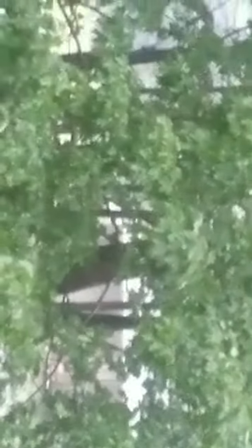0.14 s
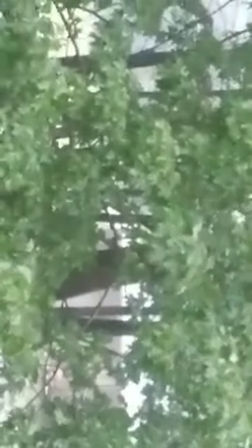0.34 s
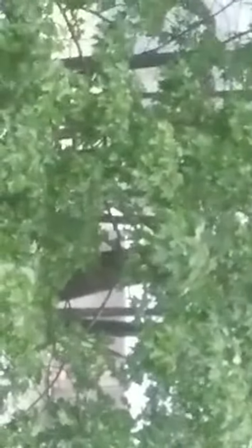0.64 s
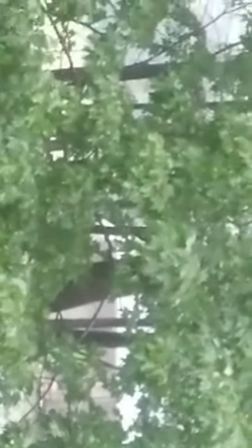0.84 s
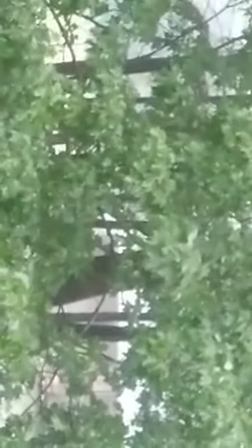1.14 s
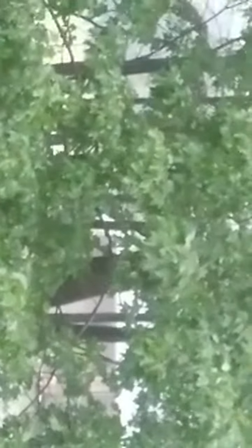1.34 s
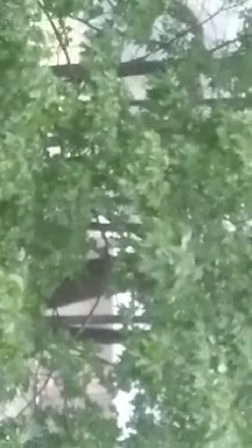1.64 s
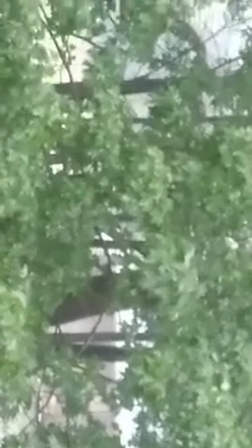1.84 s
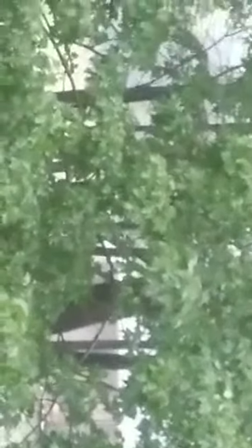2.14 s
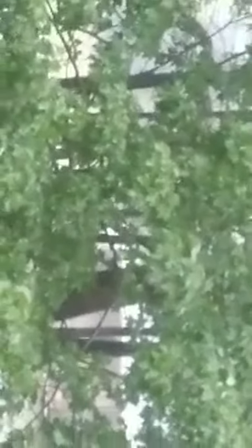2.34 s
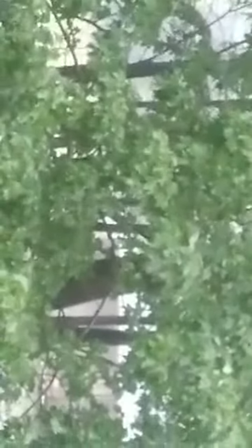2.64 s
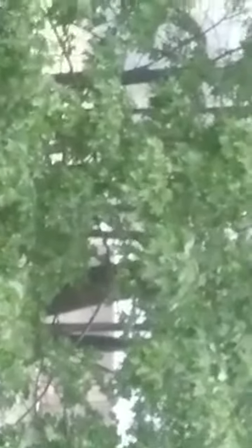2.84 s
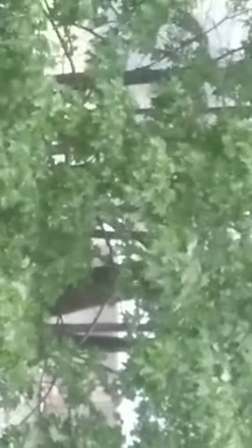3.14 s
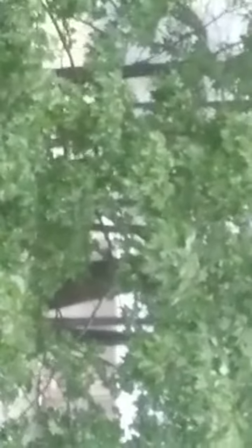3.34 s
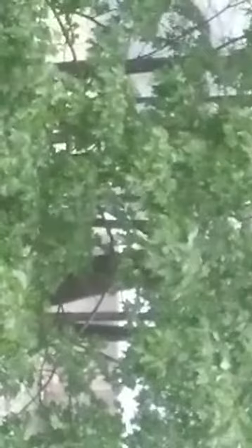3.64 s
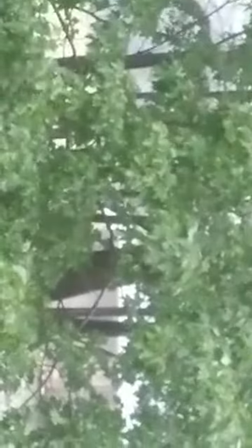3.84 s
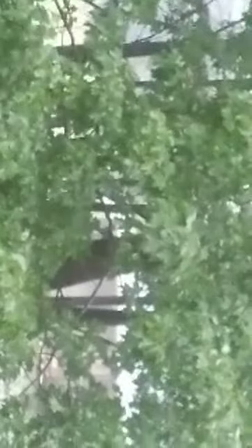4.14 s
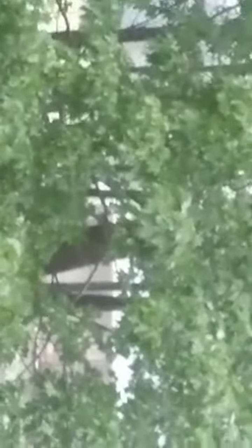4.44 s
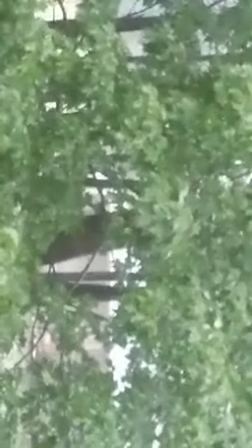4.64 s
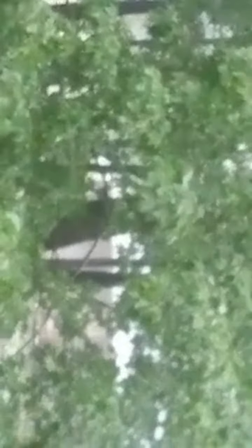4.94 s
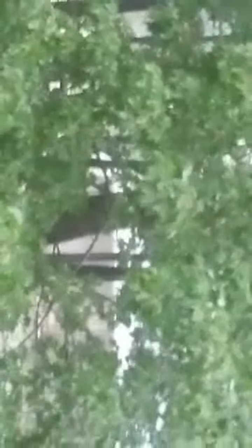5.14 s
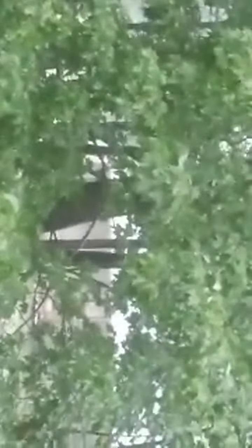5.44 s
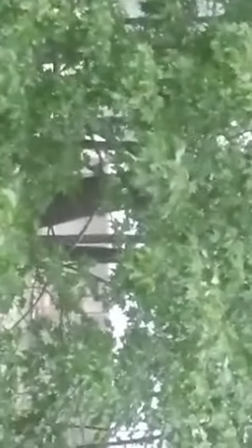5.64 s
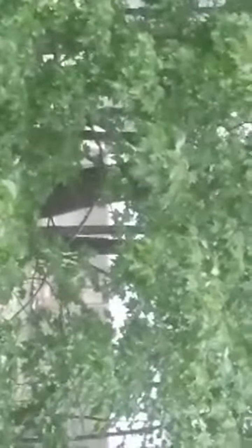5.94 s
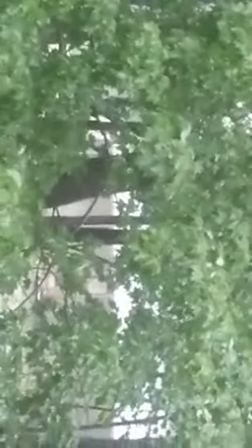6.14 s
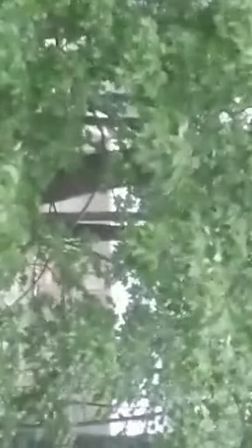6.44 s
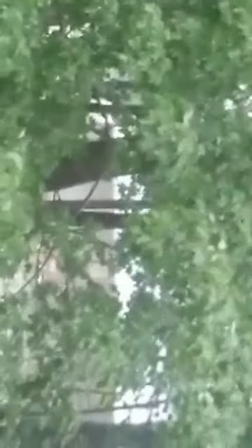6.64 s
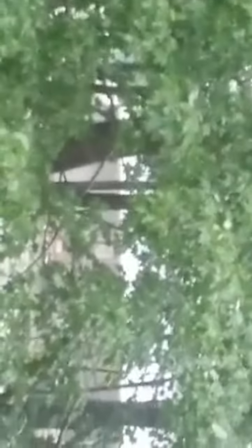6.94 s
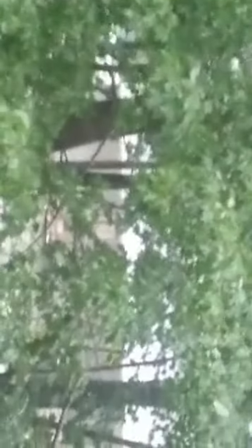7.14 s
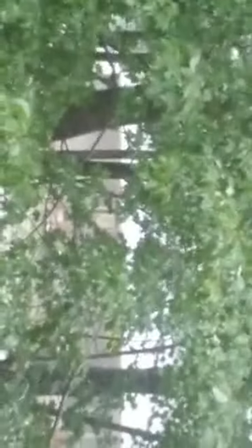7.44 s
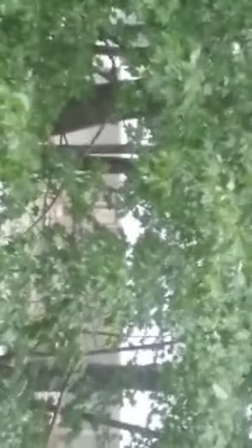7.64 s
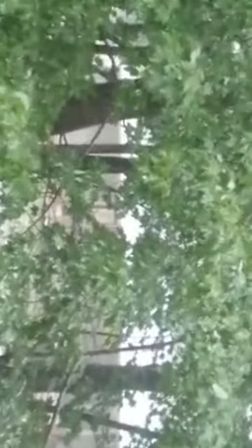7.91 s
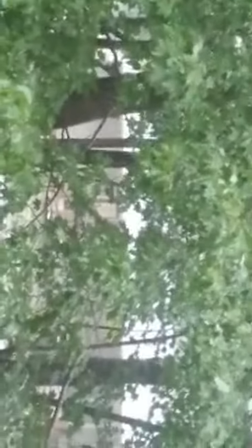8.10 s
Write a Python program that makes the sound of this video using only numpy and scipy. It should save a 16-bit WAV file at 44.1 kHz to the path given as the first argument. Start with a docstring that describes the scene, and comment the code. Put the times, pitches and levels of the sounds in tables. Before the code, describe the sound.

Light rain among leafy trees, captured close in mono by a phone. A faint hiss of distant drops is held down and surges briefly with louder drips. Leaf ticks and dull low pats come first, then higher plinks; a bright ringing clink sounds just before four seconds, two finer ones soon after, and a thin one later.

```python
"""Light rain on garden trees, in mono through a phone microphone with a noise gate.
All along, countless far drops merge into a soft hiss: shaped noise, fine patter and resonances.
From 0.4 s near drops burst on leaves as short noise and pat on slack surfaces as low damped tones.
Higher plinks join from 1.9 s; hard things clink at 3.8, twice near 4.15 and at 6.5 s, as beating modes.
The gate holds the hiss down and lets it surge up briefly with the louder drips."""
import sys
import numpy as np
from scipy import signal
from scipy.fft import rfft, irfft, next_fast_len
from scipy.io import wavfile
from scipy.ndimage import uniform_filter1d

SR = 44100
rng = np.random.default_rng(int(sys.argv[2]) if len(sys.argv) > 2 else 0)


def int16_out(signal):
    """Quantize to a 16-bit WAV file."""
    q = np.round(np.clip(np.atleast_2d(signal).T, -1, 1) * 32767)
    wavfile.write(sys.argv[1], SR, q.astype(np.int16))


N = 364707


def undb(db):
    """Decibels to gain."""
    return 10 ** (np.asarray(db) / 20)


def unit(x):
    """Scale to rms 1."""
    return x / np.sqrt(np.mean(x ** 2))


def colour(x, points):
    """Shape the spectrum by (Hz, dB) points joined on a log frequency axis; rms 1."""
    point_hz, point_db = np.transpose(points)
    size = next_fast_len(N, True)
    bin_hz = np.maximum(np.arange(size // 2 + 1) * SR / size, 1)
    gain = undb(np.interp(np.log(bin_hz), np.log(point_hz), point_db))
    return unit(irfft(rfft(x, size) * gain, size)[:N])


def resonate(x, hz, width_hz):
    """One resonance, passed twice for steep flanks; rms 1."""
    b, a = signal.iirpeak(hz, hz / width_hz, fs=SR)
    once = signal.lfilter(b, a, x + 1e-18)
    return unit(signal.lfilter(b, a, once))


def walk(rate):
    """Smooth random drift with a spread near 1, taking `rate` new values per second."""
    hold = int(SR / rate)
    steps = np.repeat(rng.standard_normal(N // hold + 1), hold)
    return unit(uniform_filter1d(steps, hold))[:N]


def swell(rise, t60):
    """Time axis and envelope of a push that builds up and dies away; peak 1."""
    t = np.arange(int((t60 + 2 * rise) * SR)) / SR
    build_up = 1 - np.exp(-(t / rise) ** 2)
    envelope = build_up * np.exp(-np.log(1000) * t / t60)
    return t, envelope / envelope.max()


def add(out, start_s, sound):
    """Mix a sound in at its start time, cut at the end of the scene."""
    i = int(start_s * SR)
    out[i:i + len(sound)] += sound[:N - i]


def patter(rate, spread_db):
    """Random impacts of either sign, `rate` per second, many small and a few large."""
    when, rank, side = rng.random((int(rate * N / SR), 3)).T
    size = undb(-spread_db * np.log(rank + .01))
    return np.bincount((when * N).astype(int), size * np.sign(side - .5), N)


# The wash of rain on far trees. Each row: frequency in Hz, relative density in dB per Hz.
WASH_SPECTRUM = [(20, -45), (48, -21), (105, -3), (175, -2.5), (240, -0.5), (420, -6), (850, -10),
                 (1500, -9), (2600, -10.5), (4600, -11.5), (6700, -7), (8600, -7.5), (10200, -13),
                 (15500, -21.5)]
# Surfaces far drops keep ringing. Each row: pitch in Hz, width of each filter pass in Hz,
# level in dB against the wash, drops per second.
RINGING_SURFACES = [(250, 204, -18, 90), (1834, 180, -15, 300), (6860, 990, -15, 150),
                    (8250, 460, -15.5, 150)]


def far_rain():
    """A wash of merged drops with flurries of fine patter on top; drops keep a few surfaces ringing."""
    wash = colour(rng.standard_normal(N), WASH_SPECTRUM) * undb(0.56 * walk(12))
    flurries = undb(1.9 * walk(16))
    fine = colour(patter(rate=600, spread_db=2.5), SPLASH_SPECTRUM) * flurries
    ringing = sum(undb(db) * resonate(patter(rate, spread_db=2.0), hz, width_hz)
                  for hz, width_hz, db, rate in RINGING_SURFACES)
    wash_db, fine_db = -46.5, -9.5  # the fine patter is set against the wash
    return undb(wash_db) * (wash + undb(fine_db) * fine + ringing)


# A drop bursting on a leaf. Each row: frequency in Hz, relative density in dB per Hz.
SPLASH_SPECTRUM = [(100, -17.5), (350, -2.5), (1000, -11), (3000, -8.5), (5000, -5.5), (7200, 1.5),
                   (9000, -7), (11000, -15), (15500, -13)]


def splashes(table, rise, t60, spray_db, spray_t60):
    """A short noise burst as the drop breaks, with a fainter, longer spray of droplets."""
    force = np.zeros(N)
    for start_s, db, *_ in table:
        add(force, start_s, undb(db) * swell(rise, t60)[1])
        add(force, start_s, undb(db + spray_db) * swell(rise, spray_t60)[1])
    return force * colour(rng.standard_normal(N), SPLASH_SPECTRUM)


def drips(table, rise, glide, wobble):
    """Each drip pushes one damped mode, whose pitch slides and trembles as the water spreads."""
    out = np.zeros(N)
    tremble = np.tile(walk(500), 2)
    for start_s, db, hz, t60 in table:
        t, envelope = swell(rise, t60)
        trembling = wobble * tremble[int(start_s * SR):][:len(t)]
        pitch = hz * (1 + glide * t + trembling)  # glide: fraction of the pitch per second, upward
        add(out, start_s, undb(db) * envelope * np.sin(2 * np.pi * np.cumsum(pitch) / SR))
    return out


def faint_drips(low_hz, high_hz, top_db, spread_db, mean_t60, count):
    """Drips further off, scattered in time and pitch, as rows (s, dB, Hz, t60 s)."""
    when, pitch, size, ring = rng.random((count, 4)).T
    hz = low_hz * (high_hz / low_hz) ** pitch
    return np.transpose([when * N / SR, top_db - spread_db * size, hz, mean_t60 * (.5 + ring)])


# Drops bursting on leaves near the microphone.
# Each row: start in seconds, level in dB before the trim shared by all leaves.
LEAF_SPLASHES = [(.4035, -42), (.503, -42.5), (.598, -44.5), (.7425, -40.5), (1.0445, -40), (1.0785, -44),
                 (1.246, -46), (1.358, -43), (1.952, -41), (2.0805, -44.5), (2.922, -44.5), (3.397, -44.5),
                 (3.411, -43.5), (4.323, -42.5), (4.499, -44), (6.4955, -42), (6.505, -45), (6.612, -44),
                 (6.905, -42), (7.2975, -42.5), (8.154, -41.5)]


def leaves(small_db, count=16):
    """Drops burst on the near leaves, with smaller ones at random in between."""
    small = [(start_s, small_db) for start_s in rng.random(count) * N / SR]
    bursts = splashes([*LEAF_SPLASHES, *small], rise=0.0027, t60=0.018, spray_db=-18, spray_t60=0.18)
    return undb(0.8) * bursts  # shared trim


# Heavy drips close by on slack, hollow surfaces.
# Each row: start in seconds, peak in dB before the trim shared by all pats, starting pitch in Hz.
HEAVY_PATS = [(0.4, -44, 358), (0.669, -34, 260), (0.788, -38, 275), (0.797, -37.5, 290), (0.998, -31, 433),
              (1.018, -39, 432), (1.921, -32, 243), (2.798, -35.5, 210), (3.368, -30, 243),
              (3.402, -38, 269), (3.511, -45.5, 563), (4.278, -43.5, 517), (6.658, -33, 386),
              (6.672, -41.5, 414), (8.238, -33, 389)]


def pats():
    """Heavy drips thud on slack surfaces, most of them near and a few further off."""
    decay_cycles = 12.4  # t60 in cycles of the starting pitch, so deep pats last longer
    near = [(start_s, db, hz, decay_cycles / hz) for start_s, db, hz in HEAVY_PATS]
    further = faint_drips(low_hz=201, high_hz=519, top_db=-44.0, spread_db=3, mean_t60=0.04, count=12)
    return undb(0.14) * drips([*near, *further], rise=0.0049, glide=0.22, wobble=0.026)


# Close drips that ring small stiff things and puddles.
# Each row: start in seconds, peak of the ring in dB, starting pitch in Hz, t60 in seconds.
NEAR_PLINKS = [(1.920, -48, 1274, .04), (3.120, -36, 2340, 0.023), (3.506, -34, 1886, 0.073),
               (4.681, -33, 5800, .05), (4.698, -40, 8820, .04), (4.742, -43.5, 1701, .04),
               (4.827, -35.5, 8000, .04), (4.829, -35.5, 1806, 0.047), (5.342, -36, 4680, 0.057),
               (5.501, -36, 8115, 0.047), (5.505, -40.5, 9399, .03), (5.515, -45.5, 7800, .017),
               (5.549, -36, 2340, 0.025), (5.589, -42.5, 3467, .035), (5.677, -35.5, 3660, 0.043),
               (5.698, -42.5, 4130, .03), (7.030, -36.5, 6310, 0.058), (7.069, -43, 2210, .037),
               (7.127, -47, 1773, .04), (7.296, -41, 3480, 0.028), (7.956, -42.5, 1780, 0.058),
               (8.238, -43, 1263, 0.016)]


def plinks():
    """Near drips splash and ring at once; further off only the ring carries, and tiny drops tick on leaves."""
    ring = drips(NEAR_PLINKS, rise=0.0045, glide=.04, wobble=0.014)
    splash = splashes(NEAR_PLINKS, rise=0.0059, t60=.022, spray_db=-24.5, spray_t60=0.092)
    distant = faint_drips(low_hz=1210, high_hz=9360, top_db=-48, spread_db=5.5, mean_t60=0.023, count=100)
    ticks = faint_drips(low_hz=5780, high_hz=9180, top_db=-47.0, spread_db=6, mean_t60=0.039, count=130)
    faint = drips([*distant, *ticks], rise=0.0032, glide=.2, wobble=.015)
    splash_db = -8  # against the ring
    return ring + undb(splash_db) * splash + faint


# Four hard things under the trees, each row a cluster of close modes.
# Each row: centre in Hz, spread to either side in Hz, level in dB, t60 in seconds.
LOUD_MODES = [(4634, 14, -35.5, 0.25), (4790, 220, -39, 0.38), (4320, 150, -39.5, 0.3),
              (4950, 770, -30.5, 0.023), (5080, 400, -42, .2), (6320, 250, -36, 0.084),
              (2345, 130, -50.5, 0.078)]
SIZZLING_MODES = [(6140, 120, -46, .14), (8330, 70, -44, 0.14), (6060, 2500, -43.5, 0.2),
                  (10600, 1700, -43, .19)]
CHIMING_MODES = [(7520, 150, -36, 0.23), (6500, 170, -44, 0.24)]
THIN_MODES = [(8560, 140, -38, 0.077), (9920, 150, -44, 0.098), (7150, 73, -46, .05), (6720, 125, -45, .22)]
# The bright clinks. Each row: start in seconds, rise in seconds, modes of the thing struck.
CLINK_HITS = [(3.795, .006, LOUD_MODES), (4.134, 0.015, SIZZLING_MODES), (4.165, 0.0055, CHIMING_MODES),
              (6.537, 0.0082, THIN_MODES)]


def clinks(count=70):
    """The drop splashes, and close modes of the hard object beat against each other as they fade."""
    splash_db = -42
    drops = [(start_s, splash_db) for start_s, *_ in CLINK_HITS]
    out = splashes(drops, rise=0.0028, t60=0.028, spray_db=-11, spray_t60=0.12)
    for start_s, rise, clusters in CLINK_HITS:
        for hz, spread_hz, db, t60 in clusters:
            t, envelope = swell(rise, t60)
            place, phase = rng.random((2, count, 1))
            rank = 2 * (np.arange(count)[:, None] + place) / count - 1
            # crowded near the centre
            modes = hz + spread_hz * np.sign(rank) * (1 - np.sqrt(1 - np.abs(rank)))
            ring = envelope * np.sin(2 * np.pi * (modes * t + phase)).sum(axis=0)
            # the beating ring gets the energy of its envelope
            same_energy = np.sqrt(np.sum(envelope ** 2) / np.sum(ring ** 2))
            add(out, start_s, undb(db) * ring * same_energy)
    return out


def scene():
    """Far rain and near drips, the same in both channels."""
    mono = far_rain() + leaves(small_db=-46.0) + pats() + plinks() + clinks()
    return np.array([mono, mono])


def gate(x, depth_db, open_db, knee_db, window_s, hold_db, hold_knee_db, hold_s, bass_hz, fade_s):
    """Noise gate: a quick detector opens it, a slow one, deaf to bass, holds it after a strong drip."""
    quick = uniform_filter1d(x ** 2, int(window_s * SR))
    bright = signal.sosfilt(signal.butter(1, bass_hz, "high", fs=SR, output="sos"), x)
    step = 1 / (hold_s * SR)
    slow = signal.lfilter([step], [1, step - 1], bright ** 2)
    quick_db, slow_db = 10 * np.log10(np.maximum([quick, slow], 1e-12))
    quick_opening = (quick_db - open_db) / knee_db
    slow_opening = (slow_db - hold_db) / hold_knee_db
    opening = np.clip(np.maximum(quick_opening, slow_opening), 0, 1)
    # the gain looks ahead and fades smoothly both ways
    fade = int(fade_s * SR)
    smooth = uniform_filter1d(uniform_filter1d(opening, fade), fade)
    return undb(depth_db * (smooth - 1))


def record(dry):
    """The phone gates the quiet background and cuts the top."""
    gain = gate(dry[0], depth_db=11.0, open_db=-44.5, knee_db=5.0, window_s=0.0069,
                hold_db=-43, hold_knee_db=0.24, hold_s=0.041, bass_hz=240, fade_s=0.0023)
    top_hz = 15850
    top_cut = signal.ellip(10, .2, 70, top_hz, fs=SR, output="sos")
    return signal.sosfilt(top_cut, dry * gain)


dry = scene()
out = record(dry)
int16_out(out)
```